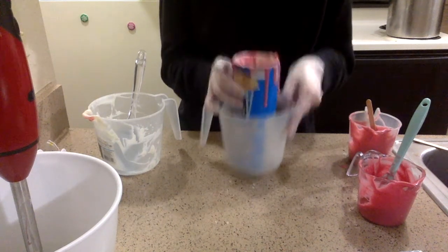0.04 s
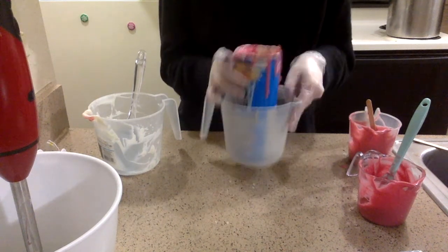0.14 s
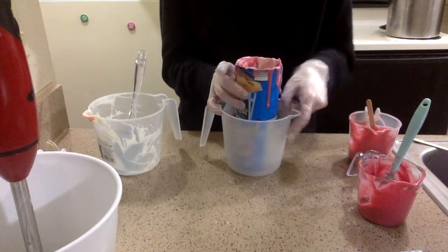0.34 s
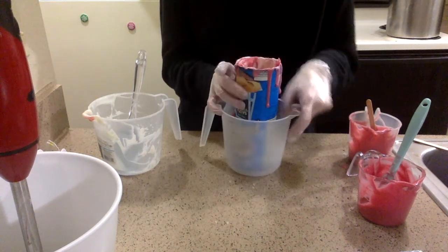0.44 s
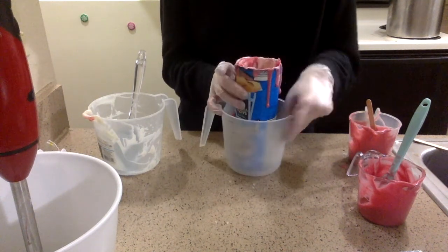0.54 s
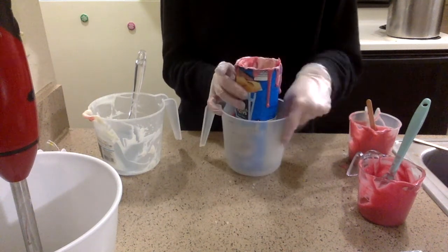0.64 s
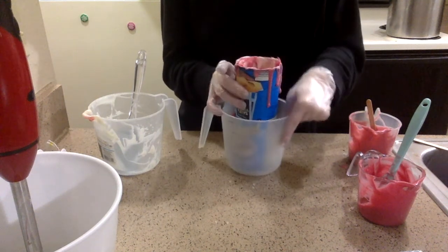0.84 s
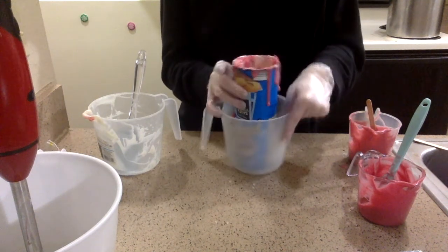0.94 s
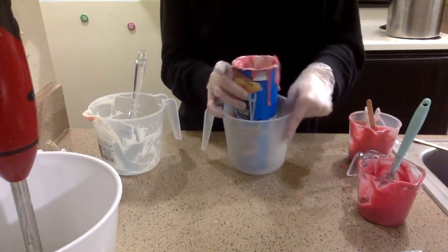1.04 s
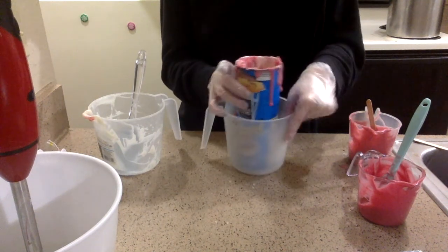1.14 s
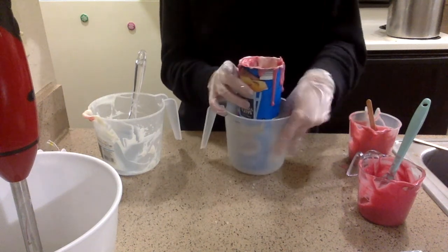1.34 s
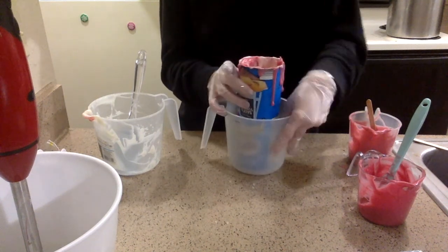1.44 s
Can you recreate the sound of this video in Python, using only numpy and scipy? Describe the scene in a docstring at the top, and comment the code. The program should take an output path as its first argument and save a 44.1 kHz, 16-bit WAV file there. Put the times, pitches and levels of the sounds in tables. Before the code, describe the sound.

A hard, hollow knock of a filled tube in a plastic jug rapped on a countertop

```python
"""A kitchen countertop, close up: a filled cardboard tube, standing in a plastic jug, is rapped down on it.
One knock is already dying away as the next lands and clips: a crack of noise, a ring of decaying sines
and a room tail of noise in bands. A soft, dull bump and small ticks of pitched noise follow, while gloved
hands slip and rub as crackling noise, over a faint hum, whine and hiss.
The recorder's noise suppressor turns quiet bands down and so thins the tails."""
import sys
import numpy as np
from scipy import signal
from scipy.fft import rfft, irfft
from scipy.io import wavfile
from scipy.ndimage import uniform_filter1d

SR = 44100
rng = np.random.default_rng(int(sys.argv[2]) if len(sys.argv) > 2 else 0)


def unload_wav(signal):
    """Save mono or channel-first audio to the path in sys.argv[1] as 16-bit WAV at rate SR, clipped to [-1, 1]."""
    wavfile.write(
        sys.argv[1],
        SR,
        np.round(np.clip(np.atleast_2d(signal).T, -1, 1) * 32767).astype(np.int16),
    )


N = 66150
T = np.arange(N) / SR  # s
CUTOFF_HZ = 15900

# hard knocks of tube and jug on the counter:
# [t/s, level/dB, ring level/dB, room tail tilt/(dB/octave), favoured pitch f/Hz, its lift/dB]
KNOCKS = [(-0.056, -3.5, -7, .4, 2236, 13.5), (0.2172, 0, 1, 0, 700, 2.5)]


def from_db(db):
    """Decibels to gain."""
    return 10 ** (np.asarray(db) / 20)


def at_hz(points, hz, axis=1):
    """Read a column of a table along log frequency."""
    table = np.array(points)
    return np.interp(np.log(np.maximum(hz, 1)), np.log(table[:, 0]), table[:, axis])


def noise(spectrum):
    """Steady noise of a given colour, rms 1: random phases under a fixed spectrum."""
    hz = np.fft.rfftfreq(N, 1 / SR)
    phases = np.exp(2j * np.pi * rng.random(len(hz)))
    audible = (hz > 20) * (hz < CUTOFF_HZ)
    x = irfft(phases * from_db(at_hz(spectrum, hz)) * audible, N)
    return x / x.std()


def dying(start, t60, swell):
    """Envelope that swells after a blow and dies exponentially; times in s."""
    age = np.maximum(T - start, 0)
    return (1 - np.exp(-age / swell)) ** 2 * np.exp(-np.log(1000) * age / t60)


def crack(start):
    """The brief broadband snap of plastic meeting the counter."""
    # colour of the contact: [f/Hz, level/dB]
    contact = [(300, -7.5), (900, -4), (1600, -3), (2500, 2), (4000, 3), (5500, -4.5), (8000, -12),
               (12000, -9.5), (15500, -7)]
    return noise(contact) * dying(start, t60=0.05, swell=0.000085)


def ring(start, favoured_hz=1000, favour_db=0):
    """The hollow ring of tube, jug and counter; the spot that lands favours the modes near one pitch."""
    # resonances of tube, jug and counter: [f/Hz, level/dB, t60/s, swell/s]
    modes = [(77.3, -13, 0.17, .014), (153.6, -7, 0.16, .003), (174.6, -16, .2, .01),
             (250.2, -14, 0.13, 0.0037), (315.5, 19, 0.08, 0.017), (352, -17, 0.26, .01),
             (505, -6.5, 0.13, 0.0013), (620.6, -5.5, 0.092, 0.0025), (661.8, 3.5, 0.061, .002),
             (764.5, -5.5, 0.051, 0.0023), (877, -16, .12, 0.00036), (950, -18, .17, 0.0023),
             (1282, -24, .18, .001), (2156, -29.5, .32, .001), (2374, -28.5, 0.29, 0.0008),
             (2620, -28, 0.11, 0.0012), (3300, -26.5, 0.16, .001), (3977, -26, .26, .001),
             (4220, -28.5, .24, .001)]
    favour_octaves = 0.12
    age = np.maximum(T - start, 0)
    out = 0
    for hz, db, t60, swell in modes:
        octaves_away = np.log2(hz / favoured_hz)
        extra_db = favour_db * np.exp(-(octaves_away / favour_octaves) ** 2)
        tone = np.sin(2 * np.pi * hz * age)
        out = out + from_db(db + extra_db) * dying(start, t60, swell) * tone
    return out


def room(start, tilt_db):
    """Diffuse tail of a blow; each third of an octave dies at its own rate."""
    # the kitchen's answer to a blow: [f/Hz, level/dB, t60/s]
    answer = [(35.5, -34, .38), (76, -0.5, .36), (160, -0.5, 0.33), (231.3, -3.5, .4), (333, 2.5, .46),
              (420, -7.5, .41), (650, -4, .34), (900, -9.5, .32), (1150, -13.5, .29), (2300, -13, 0.3),
              (3970, -12.5, .31), (5520, -20, .3), (7500, -25.5, .22), (11100, -23.5, 0.24),
              (15500, -24, .17)]
    level_db, build_s = -10.5, 0.0013
    hz = np.fft.rfftfreq(N, 1 / SR)
    tilt = from_db(tilt_db * np.log2(np.maximum(hz, 1) / 1000))  # pivots at 1 kHz
    tail = rfft(noise(answer)) * tilt
    edges = 20 * 2 ** (np.arange(31) / 3)
    out = 0
    for lo, hi in zip(edges, edges[1:]):
        band = irfft(tail * (hz >= lo) * (hz < hi), N)
        t60 = at_hz(answer, np.sqrt(lo * hi), axis=2)
        out = out + band * dying(start, t60, build_s)
    return from_db(level_db) * out


def knocks():
    """Each hard knock cracks, rings and fills the room."""
    crack_db = -7.5
    out = 0
    for start, db, ring_db, tilt_db, favoured_hz, favour_db in KNOCKS:
        snap = from_db(crack_db) * crack(start)
        body = from_db(ring_db) * ring(start, favoured_hz, favour_db)
        out = out + from_db(db) * (snap + body + room(start, tilt_db))
    return out


def bowl():
    """A bowl nearby rings on in sympathy: a faint long tone set off by each knock."""
    bowl_hz, bowl_db, t60_s = 279, -42, 1.4
    out = 0
    for start, db, ring_db, *_ in KNOCKS:
        tone = np.sin(2 * np.pi * bowl_hz * (T - start))
        out = out + from_db(db + ring_db + bowl_db) * dying(start, t60_s, swell=0.01) * tone
    return out


def background():
    """Steady coloured hiss, with mains hum and a thin electrical whine as sines."""
    # colour of the hiss: [f/Hz, level/dB]
    hiss_colour = [(18, -61.5), (30, -33.5), (134, -2.5), (210, -21.5), (295, -1), (415, -16.5), (512, -11),
                   (844, -11.5), (1130, -15.5), (2900, -14.5), (3400, -11), (7470, -25.5), (16000, -19)]
    # hum and whine: [f/Hz, rms level/dB]
    hum = [(119.5, -68), (240, -77.5), (11025, -72.5), (14925, -74)]
    out = from_db(-60.5) * noise(hiss_colour)
    for hz, db in hum:
        out = out + np.sqrt(2) * from_db(db) * np.sin(2 * np.pi * hz * T)  # rms to peak
    return out


def friction(strokes, spectrum, grain_db):
    """Rubbing that swells and fades with each stroke; every band crackles on its own."""
    grain_band_hz = 900
    power = 0
    for peak_s, db, rise, fall in strokes:
        distance = np.maximum((peak_s - T) / rise, (T - peak_s) / fall)
        power = power + from_db(2 * db) * np.exp(-2 * distance)
    hz = np.fft.rfftfreq(N, 1 / SR)
    colour = rfft(noise(spectrum))
    rough = 0
    for k in range(CUTOFF_HZ // grain_band_hz + 1):
        # random level wander, smoothed over a few milliseconds
        grain = uniform_filter1d(rng.standard_normal(N), size=160)
        grain = uniform_filter1d(grain, size=80)
        band = irfft(colour * (hz // grain_band_hz == k), N)
        rough = rough + band * from_db(grain_db * grain / grain.std())
    return np.sqrt(power) * rough / rough.std()


def glove_slips():
    """Gloves slip on the tube: bright, strongly grained friction noise."""
    # slips: [peak t/s, level/dB, rise/s, fall/s]
    slips = [(0.370, -50, 0.0016, 0.0093), (0.405, -55.5, 0.0091, 0.014), (0.468, -51.5, 0.011, 0.027),
             (0.60, -53, 0.041, 0.064), (1.122, -56, 0.0044, .03), (1.195, -49.5, 0.042, 0.08),
             (1.219, -43.5, .002, 0.0064), (1.252, -55, 0.0033, 0.0087), (1.34, -59, 0.017, .03)]
    # colour of the glove: [f/Hz, level/dB]
    glove = [(800, -27), (2500, -13), (3800, -1), (6000, -6.5), (8000, -16), (10500, -5.5), (13000, 2.5),
             (15500, 1.5)]
    return friction(slips, glove, grain_db=3.5)


def tube_rubs():
    """The tube rubs against the jug: smoother friction noise, strongest in the midrange."""
    # rubs: [peak t/s, level/dB, rise/s, fall/s]
    rubs = [(0.59, -58.5, .12, 0.15), (0.848, -61.5, .005, 0.028), (1.18, -58.5, 0.083, 0.059),
            (1.245, -56.5, 0.0087, 0.061)]
    # colour of the rubbing: [f/Hz, level/dB]
    rub_colour = [(300, -13), (1200, -5.5), (2000, -5), (2900, 0.5), (4000, -2.5), (6000, -16),
                  (12000, -28)]
    return friction(rubs, rub_colour, grain_db=1.5)


def ticks():
    """Each small contact of fingers, tube and jug is a short noise burst around one pitch."""
    # contacts: [t/s, level/dB, pitch f/Hz, t60/s]
    contacts = [(0.828, -51, 650, 0.073), (0.908, -58, 110, 0.13), (0.958, -40.5, 114, 0.076),
                (0.962, -53, 650, 0.071), (0.961, -49.5, 2300, 0.095), (1.123, -49.5, 3380, 0.13),
                (1.155, -52, 1710, 0.079), (1.179, -53, 4670, 0.033), (1.211, -54, 4300, 0.043),
                (1.216, -49.5, 4840, 0.028)]
    skirt_db = -58  # two octaves from the pitch
    out = 0
    for start, db, hz, t60 in contacts:
        colour = [(hz / 4, skirt_db), (hz, 0), (hz * 4, skirt_db)]
        out = out + from_db(db) * noise(colour) * dying(start, t60, swell=0.00074)
    return out


def bump():
    """The jug is set down softly: the same body without the treble, its ring damped by the hands."""
    start_s, level_db, cut_hz = 1.1517, -34, 1020
    crack_db, room_db = 8.5, -0.5
    damping = dying(start_s, t60=0.9, swell=0.00033)  # on top of each mode's own decay
    body = ring(start_s) * damping
    snap = from_db(crack_db) * crack(start_s)
    blow = body + snap + from_db(room_db) * room(start_s, tilt_db=0.0)
    lowpass = signal.butter(6, cut_hz, fs=SR, output="sos")
    return from_db(level_db) * signal.sosfilt(lowpass, blow)


def suppress(x):
    """Noise suppressor: overlapping bands are each turned down while their level is under the threshold."""
    # bands: [centre f/Hz, threshold level/dB]
    bands = [(100, -55), (300, -49.5), (700, -57), (1500, -60), (3500, -56), (5500, -59.5), (9000, -55),
             (14000, -52)]
    most_db, knee_db, sense_s = 5.5, 2.5, 0.011
    hz = np.fft.rfftfreq(2 * N, 1 / SR)
    spectrum = rfft(x, 2 * N)  # padded with silence
    keep = np.exp(-1 / (sense_s * SR))
    centres, thresholds = np.transpose(bands)
    out = 0
    for share, threshold_db in zip(np.eye(len(centres)), thresholds):
        # weight 1 at this centre, sloping to 0 at its neighbours
        weight = at_hz(np.column_stack([centres, share]), hz)
        band = irfft(spectrum * weight)[..., :N]
        power = signal.lfilter([1 - keep], [1, -keep], band ** 2)
        level_db = 10 * np.log10(power + 1e-18)
        quietness = 0.5 * (1 - np.tanh((level_db - threshold_db) / knee_db))  # 0 loud, 1 quiet
        out = out + band * from_db(-most_db * quietness)
    return out


def scene():
    """Everything at the microphone, as one channel."""
    handling = glove_slips() + tube_rubs() + ticks() + bump()
    return (knocks() + bowl() + background() + handling)[None]


def record(dry):
    """Quiet bands are suppressed, the loud knock clips flat and the top is cut."""
    clipped = np.clip(suppress(dry), -1, 1)
    top_cut = signal.ellip(10, 0.1, 70, CUTOFF_HZ, fs=SR, output="sos")  # ripple, stopband in dB
    return signal.sosfilt(top_cut, clipped)


dry = scene()
out = record(dry)
unload_wav(out)
```